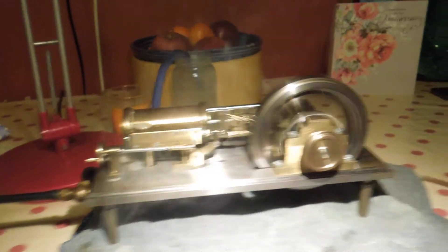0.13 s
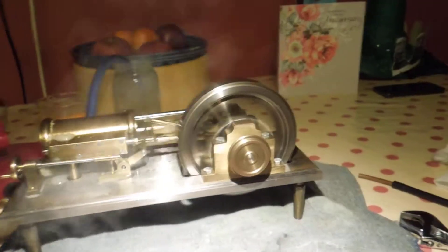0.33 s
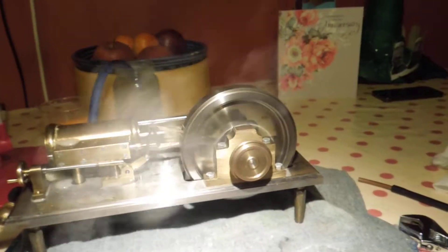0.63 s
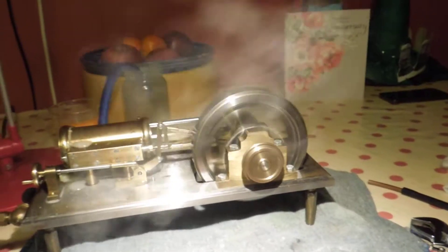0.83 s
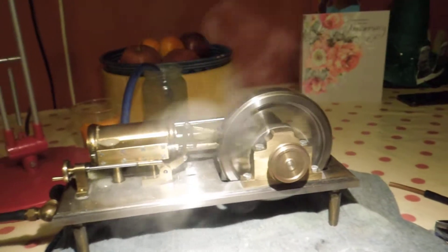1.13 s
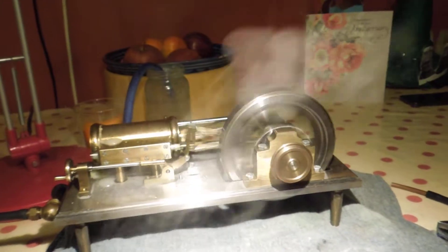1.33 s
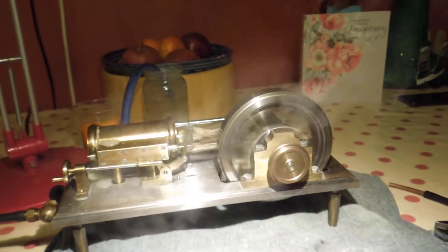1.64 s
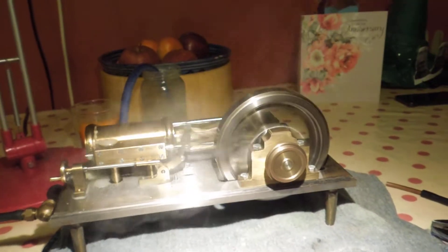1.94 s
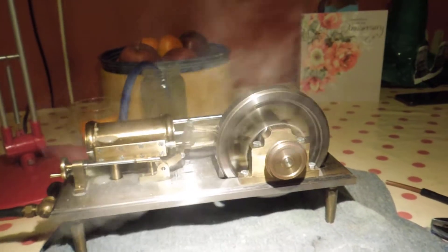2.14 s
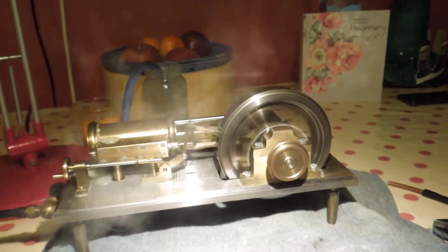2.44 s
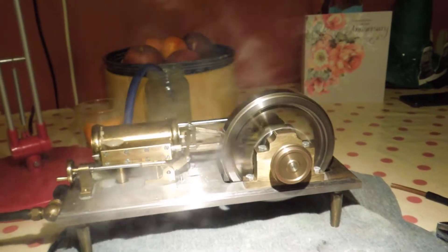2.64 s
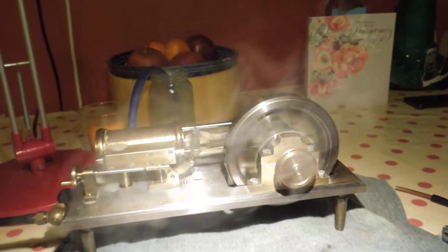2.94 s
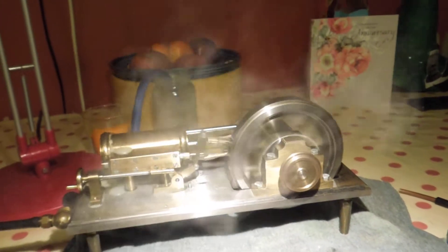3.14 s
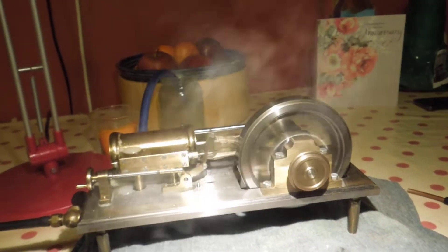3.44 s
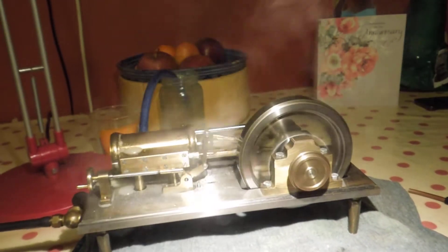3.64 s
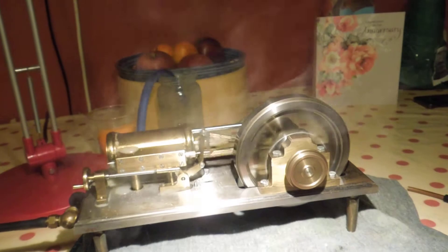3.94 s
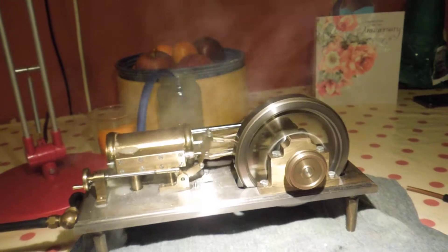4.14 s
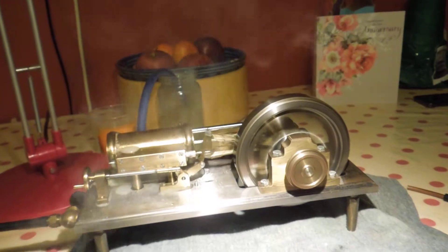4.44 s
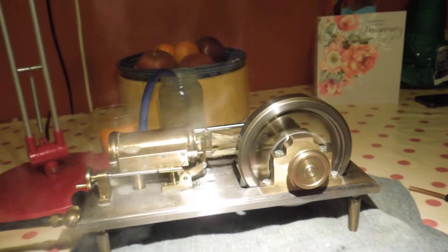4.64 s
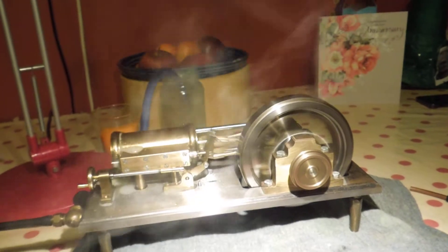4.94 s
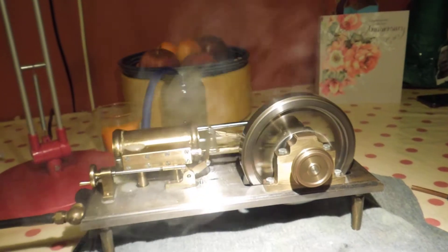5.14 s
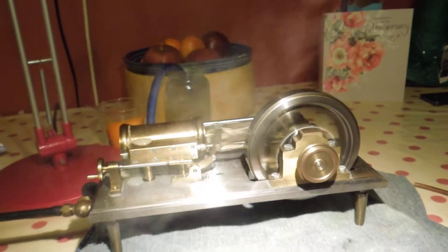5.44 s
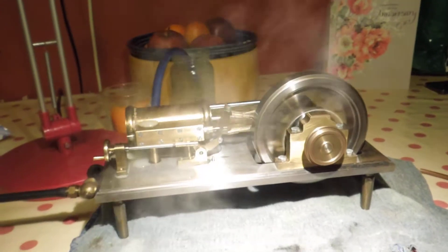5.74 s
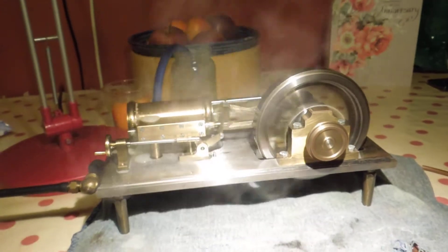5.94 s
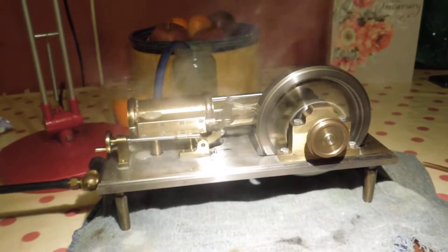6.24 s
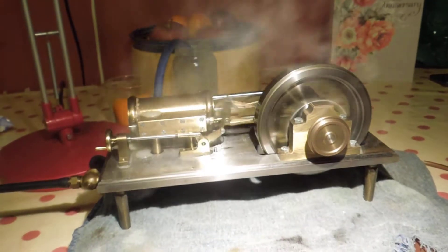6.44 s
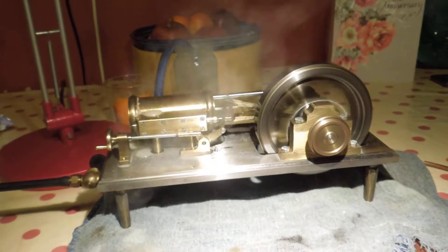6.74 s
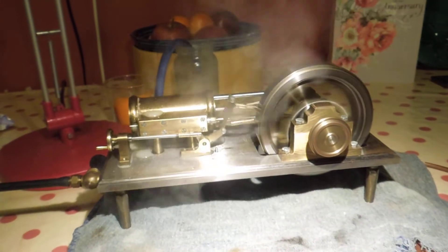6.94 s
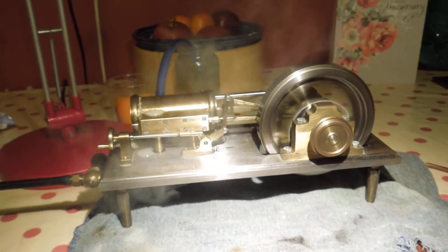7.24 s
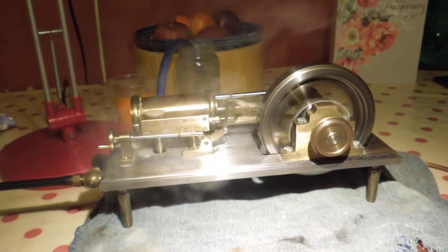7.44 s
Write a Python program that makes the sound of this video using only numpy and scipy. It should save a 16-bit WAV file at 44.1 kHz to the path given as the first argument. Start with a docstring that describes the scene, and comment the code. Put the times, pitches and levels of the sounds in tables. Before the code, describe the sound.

From 0 seconds a small steam engine is already running fast, close to the microphone on a table in a small room. About sixteen hard knocks a second sound like a rapid dull rapping around 500 to 850 hertz, each topped by a bright clack, a brief metallic ring and a quick puff of steam. Weaker return knocks and tiny bounces fill the gaps, with scattered valve ticks. Airy high hiss pulses with each stroke, over faint rattling and a low table throb near 100 to 200 hertz. The beat quickens to about seventeen a second by 2.8 seconds, eases very slightly around 3.5, then climbs steadily to about eighteen and a half by 7.6. Individual knocks and pings vary in force, but the overall level stays steady. Reverberation is short; bass is centred, while hiss spreads a little wider. It ends still running.

```python
"""Small steam engine on a steel bed

A small brass steam engine, heard close by, turns about 16 to 18.5 times a second and mostly gains speed. Impact
excites decaying modes: at each dead centre the slack rod knocks the bed and table; the outer knock and the
bounces also ring the cylinder. The harder knock also clacks the valve gear, rings the crosshead and lets a puff
of steam go. Shaking at multiples of the shaft rate throbs in the table below; leaking steam is shaped noise
throughout."""
import sys
import numpy as np
from scipy import signal
from scipy.fft import rfft, irfft, next_fast_len
from scipy.io import wavfile
from scipy.ndimage import uniform_filter1d

SR = 44100
rng = np.random.default_rng(int(sys.argv[2]) if len(sys.argv) > 2 else 0)


def file_out(sig):
    """Save sig as 16-bit WAV at sys.argv[1]."""
    # one column per channel
    cols = np.atleast_2d(sig).T
    # limit, then scale
    lim = np.clip(cols, -1, 1)
    pcm = np.round(lim * 32767).astype(np.int16)
    wavfile.write(sys.argv[1], SR, pcm)


N = 334719  # length in samples


def amp(db):
    """Level: 20 dB is a factor of ten in amplitude."""
    return 10 ** (np.asarray(db) / 20)


def unit(x):
    """Normalization to an rms of 1."""
    return x / np.sqrt(np.mean(x ** 2) + 1e-20)


def along(points, hz):
    """Interpolation of (f/Hz, value) points on a logarithmic frequency axis."""
    f, value = np.transpose(points)
    return np.interp(np.log(hz + 1), np.log(f + 1), value)


def curves(rows):
    """Linear interpolation in time: one value per sample for each column after t/s."""
    s, *columns = np.transpose(rows)
    return [np.interp(np.arange(N) / SR, s, column) for column in columns]


def filtered(x, response):
    """Linear filtering: the spectrum of x is multiplied by a response of frequency."""
    m = next_fast_len(N + SR // 2)
    hz = np.fft.rfftfreq(m, 1 / SR)
    return irfft(rfft(x, m) * response(hz), m)[..., :N]


def rush(spectrum, patchy_db):
    """Turbulence noise: two unrelated noises, jointly of rms 1, share patches of random gain."""
    cells = signal.stft(rng.standard_normal((2, N + 512)), nperseg=256)[2]
    patches = rng.standard_normal(cells.shape[1:])
    patches = uniform_filter1d(uniform_filter1d(patches, 4, 0), 5, 1)  # over frequency, then time
    pair = signal.istft(cells * amp(patchy_db * unit(patches)), nperseg=256)[1][:, :N]
    return unit(filtered(pair, lambda hz: amp(along(spectrum, hz))))


def strike(times, levels_db, modes, rise, scatter_db, loose):
    """Modal impact: each blow (times and rise in s) rings damped modes with random strengths
    and starting phases; loose is the phase scatter in radians."""
    hz, db, t60 = np.transpose(modes)[:, :, None]
    t = np.arange(SR // 5) / SR
    envelope = amp(db - 60 * t / t60) * (1 - np.exp(-t / rise))
    swing = envelope * np.exp(2j * np.pi * hz * t)
    chance = rng.standard_normal((len(times), 2, len(modes)))
    strengths = amp(levels_db[:, None] + scatter_db * chance[:, 0])
    gains = strengths * np.exp(1j * loose * chance[:, 1])
    out = np.zeros(N + 2 * SR)  # half a second of margin ahead of time 0
    for s, ring in zip(times, (gains @ swing).imag):
        start = SR // 2 + round(s * SR)
        out[start:][:len(t)] -= ring
    return out[SR // 2:][:N]


START_TURN = .487  # crank angle at time 0, in turns after an outer dead centre
# shaft speed: (t/s, speed/turns per second)
SPEED = [(0, 15.712), (.7, 16.146), (1.4, 16.547), (2.1, 16.861), (2.8, 16.979), (3.5, 16.818),
         (3.9, 16.846), (4.3, 17.16), (5, 17.539), (5.7, 17.921), (6.4, 18.224), (7, 18.431), (7.6, 18.573)]


def crank():
    """Rotation: the integral of the shaft speed is its angle in turns."""
    speed, = curves(SPEED)
    return START_TURN + np.cumsum(speed) / SR, speed


LEAD_TURNS = .23  # the jolt precedes the dead centre
LAG_S, LAG_TOP = .07, 7  # turns of lag per turn/s above the mean, for multiples up to LAG_TOP
MEAN_SPEED = 16.92  # turns a second
# shaking force: (multiple of the shaft rate, relative level/dB)
ORDERS = [(2, 0), (3, -9), (4, -4), (5, 6), (6, 0), (7, -3), (8, 5), (9, -10), (10, 0), (11, -9), (12, 0)]
# how freely the table answers the shaking: (f/Hz, relative level/dB)
SWAY = [(30, -45), (72, -45.5), (80, -59), (86, -53.5), (93, -41), (101, -29.5), (107, -36.5), (111, -31.5),
        (118, -33), (123, -42), (130, -54), (138, -45.5), (160, -45.5), (170, -58), (185, -42.5),
        (193, -44.5), (202, -37), (211, -35.5), (218, -37), (223, -46)]
# strength of the throb: (t/s, relative level/dB)
PRESSING = [(0, -0.5), (2.6, -1.5), (3.8, 0), (4.6, -1), (7.59, -2)]


def throb(turns, speed):
    """Forced vibration: multiples of the shaft rate swell as they pass the table's resonances.
    The low ones trail further behind as the speed rises."""
    level_db, = curves(PRESSING)
    behind = LAG_S * (speed - MEAN_SPEED)
    shake = np.zeros(N)
    for k, db in ORDERS:
        angle = turns + LEAD_TURNS - behind * (k <= LAG_TOP)
        level = np.sqrt(2) * amp(db + along(SWAY, k * speed))
        shake += level * np.sin(2 * np.pi * k * angle)
    sway_hz, width_hz = 112, 21

    def all_pass(f):
        return np.exp(-2j * np.arctan2(f * width_hz, sway_hz ** 2 - f ** 2))

    return filtered(amp(level_db) * shake, all_pass)


# steam pressure at the leaks around one turn: (phase/turn, relative level/dB)
BREATH = [(0, 3), (.04, 3.5), (.17, 3.5), (.24, -1.5), (.34, 3.5), (.47, -3.5), (.53, 1), (.68, -1),
          (.85, -0.5), (1, -0.5)]
# slow course of the leaks: (t/s, relative hiss level/dB, relative rattle level/dB)
STEAM = [(0.0, -33, -42), (1.35, -36, -46.5), (1.77, -34.5, -41.5), (7.25, -33.5, -43.5),
         (7.59, -36.5, -45.5)]
# spectral shape of escaping steam: (f/Hz, relative level per Hz/dB)
HISS = [(1290, -33), (2200, -8), (3180, -13), (4120, -6.5), (5130, -8), (5720, 1), (6380, -2.5),
        (9970, 1.5), (12300, 3), (13500, 3), (14300, -19)]
# spectral shape of the loose parts on the bed: (f/Hz, relative level per Hz/dB)
RATTLE = [(40, -1), (150, 0.5), (300, -5), (500, -4), (640, -2), (800, 3.5), (870, -8.5), (1110, -0.5),
          (1430, -14), (1720, -8), (2180, -15), (3500, -10.5)]


def steam(turns):
    """Modulated turbulence: leaks hiss with the stroke's pressure; loose parts rattle the bed faintly."""
    hiss_db, rattle_db = curves(STEAM)
    stroke_db = np.interp(turns % 1, *np.transpose(BREATH))
    hiss = amp(hiss_db + 0.5 + stroke_db) * rush(HISS, patchy_db=2)
    rattle = amp(rattle_db + 7.5 + 1.22 * stroke_db) * rush(RATTLE, patchy_db=1.5)
    return hiss + rattle


KNOCK_SCATTER_DB, RETURN_SCATTER_DB = 0.82, 2.5
CLACK_DB, CLACK_SCATTER_DB = -18, 3  # valve gear on an ordinary turn
RING_DB, RING_SCATTER_DB = -30, 5.5  # crosshead on an ordinary turn
# drifting slack of the rod: (t/s, relative outer knock level/dB, relative return knock level/dB)
SLACK = [(0, -4.5, -14.5), (.4, -4.5, -11.5), (.65, -3, -18), (.9, -5.5, -12), (1.3, -6.5, -15.5),
         (1.55, -3, -31), (1.75, -3.5, -12.5), (2.5, -3.5, -16), (2.95, -3.5, -19), (3.3, -6.5, -10),
         (3.7, -1.5, -12.5), (4.3, -2.5, -9.5), (4.65, -6, -17.5), (4.85, -3, -23), (5.18, -1.5, -12.5),
         (5.3, -3, -19), (5.7, -3, -26), (5.9, -2, -19), (6.3, -5.5, -12), (6.65, -1, -27),
         (6.85, -4, -14.5), (7.3, -1.5, -26), (7.59, -6.5, -24)]
# turns whose levels are set one by one: ringing crossheads, soft landings and some plain hard knocks:
# (t/s, relative knock level/dB, relative clack level/dB, relative crosshead ring level/dB)
SET_TURNS = [(.032, -2.5, -14.5, -21), (.16, -5.5, -15, -20), (.223, -13, -14, -23), (.536, -2, -11.5, -14),
             (.598, -3.5, -14.5, -20), (.722, -2.5, -13, -24), (.784, -6, -18, -26), (.969, -9, -19, -47),
             (1.091, -9.5, -16, -19), (1.213, -4.5, -13, -11), (1.335, -8.5, -14, -33),
             (1.516, -5.5, -18, -20), (1.576, -7, -16.5, -39), (1.636, -7.5, -17, -39),
             (1.696, -7, -17, -29), (1.875, -6.5, -13.5, -15.5), (1.994, -3, -17, -12),
             (2.291, -4, -16, -17), (2.41, -5.5, -15, -28), (2.764, -4, -18, -13.5), (3.414, -6, -19, -17),
             (3.533, -3, -13.5, -17), (3.592, 0, -14.5, -27), (3.711, -5.5, -18.5, -34),
             (3.771, -4.5, -12.5, -44), (3.889, -2, -11.5, -9), (4.008, -6, -16.5, -20),
             (4.36, -11.5, -20, -22), (4.418, -7.5, -20.5, -15.5), (4.649, -7.5, -17, -15.5),
             (4.707, -5.5, -11.5, -17), (5.05, -3.5, -17, -20), (5.163, -7, -17, -18.5),
             (5.22, -5, -14.5, -25), (5.67, -5.5, -21, -19.5), (5.782, -5.5, -16, -31),
             (5.837, -5.5, -18, -21), (6.114, -6.5, -16, -18.5), (6.17, -2, -26, -44),
             (6.28, -10.5, -14.5, -24), (6.554, -5, -18, -18.5), (6.609, -1.5, -15.5, -17),
             (6.827, -7.5, -12, -14), (6.935, -4.5, -17, -20), (6.99, -6, -15.5, -20),
             (7.044, -6.5, -15, -33), (7.207, -6, -9.5, -16), (7.423, -4.5, -15.5, -19)]


def strokes(turns, speed):
    """Impact strength follows the slack: per turn, the time of the outer dead centre and the
    levels of knock, clack, ring and return knock."""
    whole_turns = np.arange(int(turns[-1]) + 1)
    s = np.interp(whole_turns, turns, np.arange(N) / SR, left=-START_TURN / speed[0])
    at, outer_db, inner_db = np.transpose(SLACK)
    chance = np.clip(rng.standard_normal((len(s), 4)).T, -2, 2)
    knock_db = np.interp(s, at, outer_db) + KNOCK_SCATTER_DB * chance[0]
    clack_db = CLACK_DB + CLACK_SCATTER_DB * chance[1]
    ring_db = RING_DB + RING_SCATTER_DB * chance[2]
    return_db = np.interp(s, at, inner_db) + RETURN_SCATTER_DB * chance[3]
    for moment, *levels in SET_TURNS:
        turn = np.argmin(abs(s - moment))
        knock_db[turn], clack_db[turn], ring_db[turn] = levels
    return s, knock_db, clack_db, ring_db, return_db


RETURN = .497  # fraction of a turn at which the inner dead centre knocks
# loose play later in the turn: (phase/turn, relative level/dB, scatter/dB)
BOUNCES = [(0.152, -23, 1.5), (0.218, -15, 2), (.31, -19, -2), (0.719, -18.5, 2)]
# modes of the bed plate: (f/Hz, relative level/dB, t60/s)
BED = [(479, -15, 0.048), (533, 6, 0.025), (592.3, 8.5, 0.034), (631.2, 7, 0.048), (647.7, -6, 0.13),
       (803, -37, 0.035), (837, 1.5, 0.016), (859.2, -18, 0.088), (970, -1.5, 0.011), (1180, -42, 0.03)]
# modes of the table top under the even thrust of the piston: (f/Hz, relative level/dB, t60/s)
TABLE = [(239.5, -0.5, 0.16), (266, -10, 0.074), (311.5, -2, 0.21), (356, -7, 0.064), (373.7, 1.5, 0.26),
         (405, -20, 0.22)]
# modes of the cylinder, heard a moment after the blow: (f/Hz, relative level/dB, t60/s)
CYLINDER = [(1727, 8, 0.025), (1842, 5, 0.03), (1940, 5.5, 0.024)]
# drift of the cylinder's answer: (t/s, relative level/dB)
TAP = [(0.0, -53), (1.16, -44.5), (7.59, -48)]


def knocks(blows):
    """Impact across a clearance: the rod takes up its slack at both dead centres and bounces between."""
    s, knock_db, _, _, return_db = blows
    period = np.gradient(s)
    s = s - .0004
    back = s + RETURN * period + .0004
    bed = strike(s, knock_db, BED, rise=.007, scatter_db=.8, loose=.08)
    bed += strike(back, return_db, BED, rise=.006, scatter_db=1, loose=.1)

    even = np.zeros(len(s))
    table = strike(s, even - 34, TABLE, rise=0.0067, scatter_db=-2.5, loose=0.036)
    table += strike(back, even - 40, TABLE, rise=0.022, scatter_db=-0.5, loose=.05)

    tap_db = np.interp(s, *np.transpose(TAP))
    blow_db = tap_db + 8 + 0.72 * (knock_db + 6.5)
    cylinder = strike(s + 0.00303, blow_db, CYLINDER, rise=0.00044, scatter_db=1.25, loose=0.77)
    for share, db, scatter_db in BOUNCES:
        at = s + share * period + .00015 * rng.standard_normal(len(s))
        level_db = db + scatter_db * rng.standard_normal(len(s))
        bed += strike(at, level_db - 6, BED, rise=.006, scatter_db=1.2, loose=.12)
        cylinder += strike(at + 0.00293, tap_db + level_db + 7, CYLINDER,
                           rise=.001, scatter_db=4.0, loose=2.8)
    return amp(-3.5) * bed + table + cylinder


# spectral shape of the edge of the blow: (f/Hz, relative level per Hz/dB)
TICK = [(700, -32), (1000, 6), (1250, -4), (1450, -15), (2000, -7), (3000, -8), (6000, -8), (9000, -10)]
# modes of the valve gear: (f/Hz, relative level/dB, t60/s)
VALVE = [(7400, -5.5, 0.032), (8300, -5, 0.026), (9840, 4.5, 0.016), (10290, 5, 0.01), (11900, 4, 0.011),
         (12600, 0.5, 0.016), (13400, -2, .015)]
# modes of the crosshead and guide bars: (f/Hz, relative level/dB, t60/s)
CROSSHEAD = [(3400, -11.5, 0.053), (3865, -3, 0.039), (4230, -5, 0.046), (4060, -9.5, 0.11),
             (5660, 0.5, 0.025), (5870, -7, 0.056)]


def clacks(blows):
    """Transient plus modes: the hard knock rings the small parts over a short crack and puff of noise."""
    s, _, clack_db, ring_db, _ = blows
    at, t = s + .0006, np.arange(N) / SR
    last = np.clip(np.searchsorted(at, t) - 1, 0, None)  # latest blow at each sample
    since = t - at[last]
    attack = 1 - np.exp(-since / 0.00013)
    decay = amp(-4.5 - 60 * since / 0.0095) + amp(-15.0 - 60 * since / 0.15)  # crack, then puff
    mid, other = amp(clack_db[last]) * decay * attack * rush(HISS, patchy_db=5.0)
    edge = amp(.5 * ring_db[last] - 14.0 - 60 * since / 0.014) * attack
    mid += edge * rush(TICK, patchy_db=5.5)[0]
    mid += strike(at, clack_db - 12.0, VALVE, rise=0.00016, scatter_db=3.5, loose=4.7)
    other += strike(at, clack_db - 27, VALVE, rise=.0002, scatter_db=8, loose=3.4)
    mid += strike(at, ring_db - 9.5, CROSSHEAD, rise=0.000093, scatter_db=2.5, loose=4.26)
    return np.array([mid, other]) + chatter(s, count=300)


def chatter(s, count):
    """Random impacts: the valve gear ticks at chance moments; return knocks ring the crosshead unevenly."""
    moment, size = rng.random((count, 2)).T
    at = moment * N / SR
    level_db = -44 - 4 * np.log(size + 0.045)  # few ticks are strong
    mid = strike(at, level_db, VALVE, rise=.0002, scatter_db=1.5, loose=2.8)
    other = strike(at, level_db, VALVE, rise=.0002, scatter_db=1.5, loose=2.8)
    ring_db = -41 + 4.7 * rng.standard_normal(len(s))
    back = s + RETURN * np.gradient(s)
    mid += strike(back, ring_db, CROSSHEAD, rise=.0003, scatter_db=5, loose=3.2)
    return np.array([mid, other])


# decay of the room: (f/Hz, t60/s)
ROOM = [(400, 0.17), (650, 0.23), (2000, 0.4), (12000, 0.15)]


def room(x):
    """Reverberation: x is convolved with noise whose every frequency dies at its own speed."""
    hz, t, cells = signal.stft(rng.standard_normal(SR // 2), SR, nperseg=256)
    decay = amp(-60 * t / along(ROOM, hz)[:, None])
    tail = signal.istft(cells * decay, SR, nperseg=256)[1]
    delayed = np.pad(x, (300, 0))  # samples
    return signal.fftconvolve(delayed, tail / np.linalg.norm(tail))[:N]


# likeness of the two ports: (f/Hz, left-right likeness)
ALIKE = [(60, .9990), (300, .998), (1000, .997), (2300, .993), (4300, .988), (5800, .95), (8000, .62),
         (14700, .45)]


def stereo(mid, other):
    """Interchannel coherence: close microphone ports agree in the bass, less so in the treble."""
    def mix(hz):
        turn = np.arccos(np.clip(along(ALIKE, hz), -1, 1)) / 2
        return np.array([np.cos(turn), np.sin(turn)])

    mid, side = filtered(np.array([mid, other]), mix)
    return np.array([mid + side, mid - side])


def scene():
    """Superposition of throb, steam, knocks, clacks and the room's answer to the blows."""
    turns, speed = crank()
    blows = strokes(turns, speed)
    bed = knocks(blows)
    mid, other = clacks(blows)
    mid += bed
    air = steam(turns)
    tail = amp(-12.0) * room(mid)
    bed_side = amp(-44.0) * bed
    return stereo(mid + tail + throb(turns, speed) + air[0], other + air[1] + bed_side + tail)


TOP_HZ = 14250  # band limit
# treble balance of the ports: (f/Hz, left minus right level/dB)
LEAN = [(5000, 0), (8000, .1), (10500, .8), (14000, 2.9)]


def record(dry):
    """Saturation and band limiting: loud peaks are rounded and the band ends steeply at TOP_HZ;
    the left port is a little brighter and nearer."""
    held = dry / (1 + abs(dry / .95) ** 6) ** (1 / 6)

    def ports(hz):
        left_over_right = amp(along(LEAN, hz)) * np.exp(2j * np.pi * hz * 6e-6)  # left leads by 6e-6 s
        lean = left_over_right ** np.array([[.5], [-.5]])
        return lean / np.sqrt(1 + (hz / TOP_HZ) ** 200)

    return filtered(held, ports)


dry = scene()
out = record(dry)
file_out(out)
```